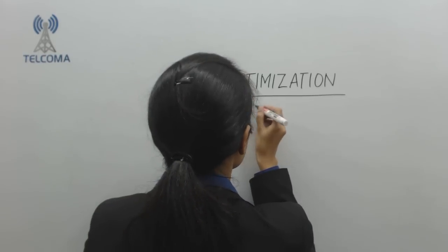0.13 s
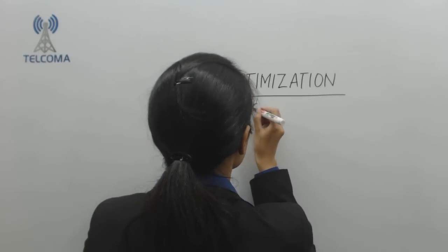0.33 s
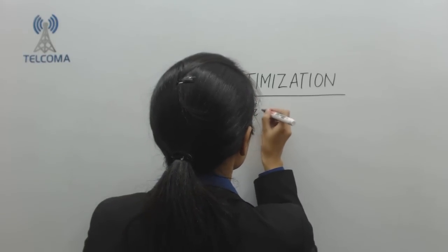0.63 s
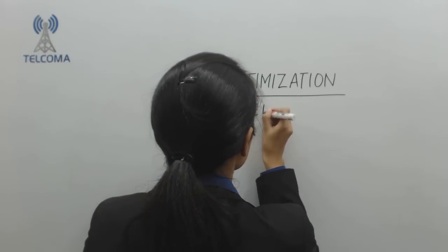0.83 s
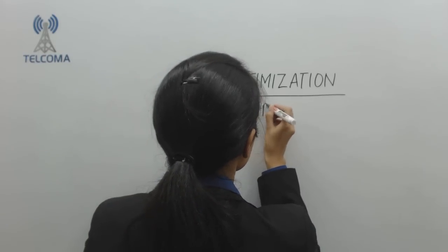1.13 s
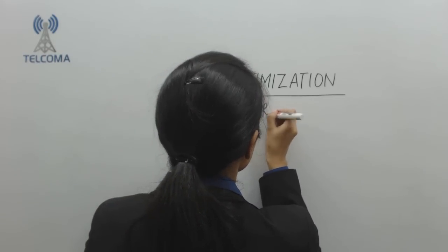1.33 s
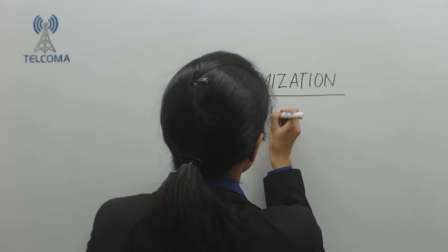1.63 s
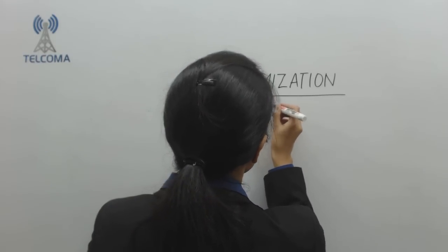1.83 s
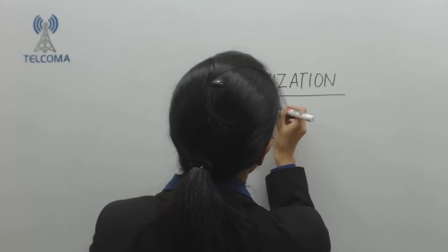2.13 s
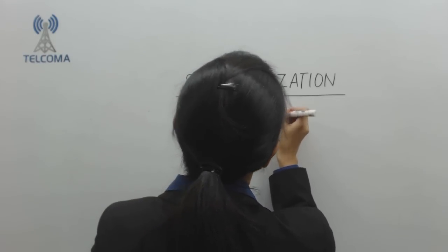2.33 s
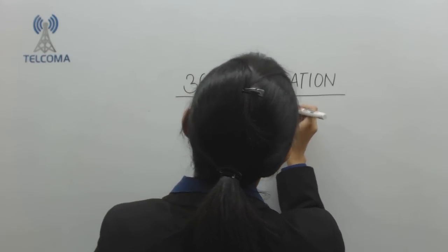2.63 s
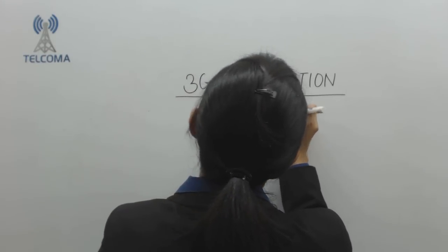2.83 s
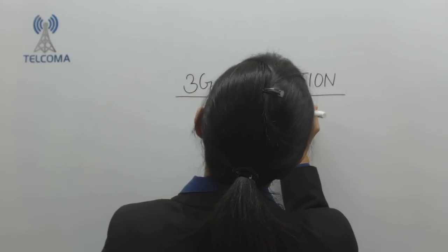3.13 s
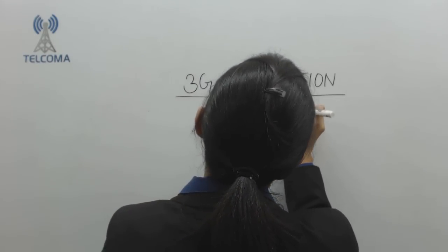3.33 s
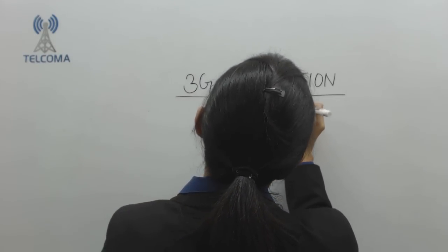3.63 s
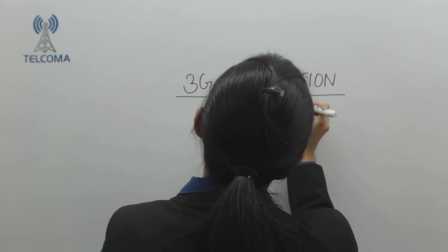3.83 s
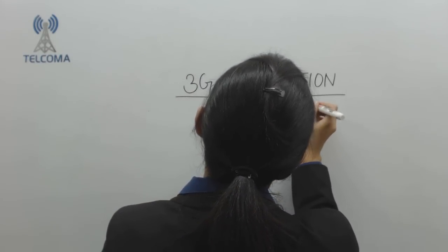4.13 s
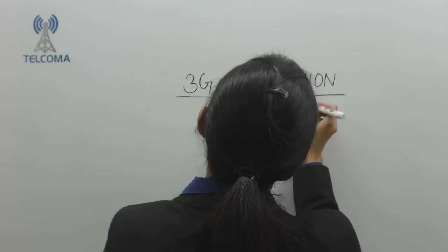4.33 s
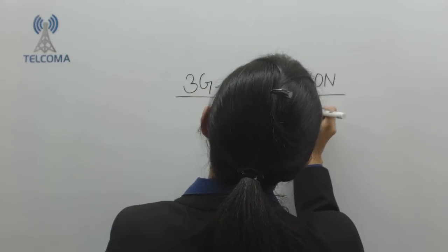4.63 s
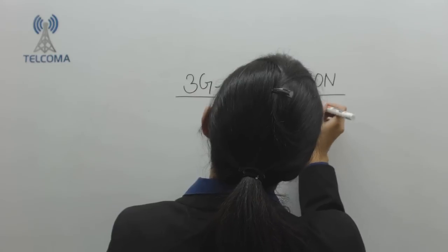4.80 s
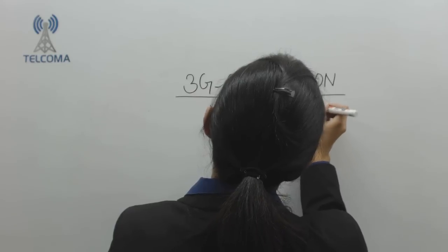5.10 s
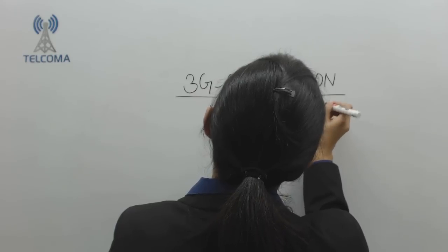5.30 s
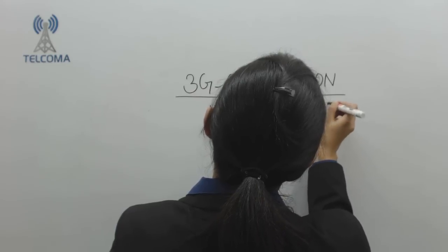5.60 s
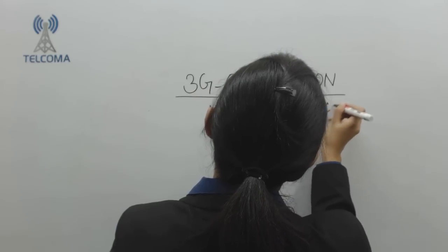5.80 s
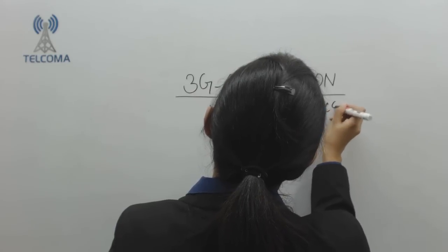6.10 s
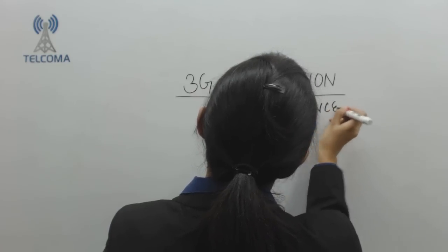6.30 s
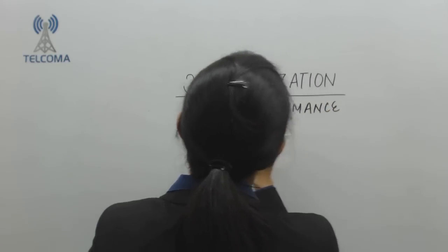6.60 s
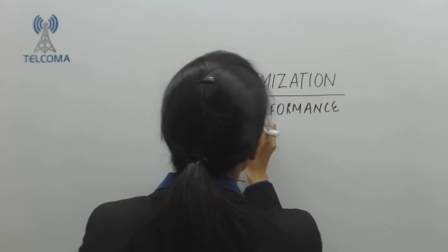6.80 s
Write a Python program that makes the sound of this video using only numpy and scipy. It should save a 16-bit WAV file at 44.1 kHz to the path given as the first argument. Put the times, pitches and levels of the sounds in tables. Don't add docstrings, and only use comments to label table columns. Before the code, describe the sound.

A low, slightly wavering fan hum with dull room noise runs throughout, briefly surging now and then. A faint felt hiss comes at 0.1 s, then the marker's first soft hollow thump on the whiteboard at 0.35 s. Similar thumps follow near 0.9, 1.15, 1.7 and 1.95 s, the loudest at about 2.2 s, then 2.35 and 2.9 s. Each is low, rounded and damped, with quick classroom echoes. Short airy strokes hiss quietly between them, and the dragging tip leaves a faint low panel ring. Weaker thumps come at 3.1 and 3.55 s, with a tiny scuff near 3.4 s. After a quieter stretch with light strokes, a firmer, knockier landing comes at 4.8 s, followed by smaller taps until 5.45 s. Faint strokes continue to about 6.4 s, then mostly hum, with slight panel ringing near the end. Thin recorder hiss and a barely audible high ticking whine remain.

```python
import sys
import numpy as np
from scipy import signal
from scipy.io import wavfile

SR = 44100
rng = np.random.default_rng(int(sys.argv[2]) if len(sys.argv) > 2 else 0)


def transcribe(u):
    v = np.clip(np.atleast_2d(u).T, -1, 1)
    q = np.round(v * 32767).astype(np.int16)
    wavfile.write(sys.argv[1], SR, q)


def ratio(d):
    e = np.asarray(d, float) / 20
    return 10 ** e


N = 306495


def rms_one(x):
    return x / np.sqrt(np.mean(x ** 2) + 1e-20)


def at_hz(points, hz):
    table_hz, value = np.transpose(points)
    return np.interp(np.log(hz), np.log(table_hz), value)


def drift(rate_hz):
    r = np.exp(-80 * np.pi * rate_hz / SR)
    noise = rng.standard_normal(N // 40 + 2002)
    slow = signal.lfilter([1], [1, -2 * r, r * r], noise)[2000:]
    return np.interp(np.arange(N) / 40, np.arange(len(slow)), rms_one(slow))


def resonate(x, hz, width_hz, count=1):
    r = np.exp(-np.pi * width_hz / SR)
    feed = np.array([1, 0, -1]) * (1 - r * r) / 2
    ring = [1, -2 * r * np.cos(2 * np.pi * hz / SR), r * r]
    for _ in range(count):
        x = signal.lfilter(feed, ring, x)
    return x


def pan(x, left_over_right_db):
    return x * ratio(np.array([[.5], [-.5]]) * left_over_right_db)


# start_s [s], peak_db [dB], hard_knock_db [dB re panel thump],
# near_wall_echo_db [dB], tail_db [dB]
LANDINGS = [(0.345, -21.5, -37, -13.5, -23.5), (0.616, -48, -30, -15, -29),
            (0.888, -21, -34.5, -13.5, -25.5), (0.991, -42.5, -29, -7, -26),
            (1.158, -23.5, -29.5, -18.5, -26), (1.67, -22, -41, -13.5, -23),
            (1.945, -17.5, -33.5, -10.5, -20.5), (2.179, -11.5, -22, -12, -19),
            (2.345, -17.5, -38, -9, -22.5), (2.458, -44.5, -17, -2.5, -28), (2.875, -16, -26, -12, -19),
            (3.119, -25.5, -36, -7, -24), (3.549, -21.5, -27, -14, -21.5), (4.27, -39.5, -14, -14, -25),
            (4.789, -14, -11, -11, -21), (4.963, -21, -18.5, -11.5, -27), (5.108, -45, -33, -18, -24),
            (5.199, -28.5, -19.5, -11, -27), (5.441, -38.5, -23, -24, -26), (6.017, -48.5, -21, -16, -13)]
# pitch_hz [Hz], width_hz [Hz], level_db [dB]
KNOCK_MODES = [
    (476, 182, 8.5),
    (666, 170, -4.5),
    (1110, 440, -22.5),
]
# delay_s [s], level_db [dB re tail]
FAR_WALLS = [
    (.041, -1),
    (.051, 3),
    (.063, -2.5),
    (.086, -8),
    (.114, -17.5),
]
# pitch_hz [Hz], width_hz [Hz], level_db [dB]
TAIL_MODES = [
    (177, 37, -6.5),
    (281, 140, -1),
    (446.3, 100, -6.5),
    (530, 200, -14),
]


def taps():
    panel_hz, panel_width_hz = 269.1, 143
    stiffening_per_db = .0035
    near_wall_s, knock_lag_s, swell_lead_s = .0258, 0.00591, 0.00603
    tail_t60_s, tail_cut_s = 0.25, 0.098

    out, length = np.zeros((2, N + SR)), SR // 4
    t = np.arange(length) / SR
    push = -np.sin(np.pi * np.clip(t / .0012, 0, 1)) ** 2

    knock = sum(ratio(db) * rms_one(resonate(push, hz, width, count=3)) for hz, width, db in KNOCK_MODES)
    knock = np.roll(knock, round(knock_lag_s * SR)) / abs(knock).max()

    modes = [ratio(db) * rms_one(resonate(push, hz, width, count=3)) for hz, width, db in TAIL_MODES]
    dull, bright = np.array([modes[0] + modes[1], modes[2] + modes[3]]) / abs(sum(modes)).max()

    build_up = np.clip((t - .010) / 0.0061, 0, 1)
    swell = build_up * ratio(-60 * t / tail_t60_s) / (1 + (t / tail_cut_s) ** 12)

    for start_s, peak_db, knock_db, echo_db, tail_db in LANDINGS:
        hz = panel_hz * (1 + stiffening_per_db * (peak_db + 20))
        body = resonate(push, hz * 0.99, panel_width_hz, count=5)
        body = body / abs(body).max()
        hard = ratio(knock_db) * knock

        paths = np.zeros(length)
        for delay_s, db in FAR_WALLS:
            arrival = round((delay_s + rng.normal(0, .001)) * SR)
            paths[arrival] = ratio(tail_db + db + rng.normal(0, 3.4))
        paths[0], paths[round(near_wall_s * SR)] = 1, ratio(echo_db)
        direct = signal.fftconvolve(paths, body + 0.26 * hard)
        direct[:length] += 0.53 * hard

        common, own = rng.standard_normal(length), rng.standard_normal((2, length))
        diffuse = ratio(tail_db - 20) * swell
        tail = signal.fftconvolve(diffuse * (common + 0.38 * own), dull[None], axes=1)
        wider = diffuse * (common + 1.0 * own) * ratio(0.28 * (knock_db + 28.5))
        tail += signal.fftconvolve(wider, bright[None], axes=1)

        at = round(start_s * SR) - round(swell_lead_s * SR)
        out[:, at:at + length] += pan(ratio(peak_db) * (direct + tail)[:, :length], 3.0)
    return out[:, :N]


# fastest_moment_s [s], length_s [s], hiss_db [dB],
# lower_resonance_db [dB re hiss], upper_pitch_hz [Hz]
FIRM_STROKES = [(0.097, 0.098, -74.5, -7, 6400), (0.471, 0.14, -82, -0.5, 6510),
                (0.64, 0.13, -78, -1, 6630), (0.975, .1, -67, -8, 6500), (1.318, 0.1, -80.5, -1, 6800),
                (1.456, 0.093, -81, -1, 6560), (1.755, .09, -70.5, -11, 6600),
                (1.989, 0.11, -79.5, 1.5, 6780), (2.439, .1, -74.5, -3, 7040), (2.545, .1, -72, -18, 6940),
                (2.625, .08, -81.5, 5, 6960), (2.953, 0.087, -72.5, -3, 7040),
                (4.088, 0.073, -70.5, -15, 7100), (4.358, 0.092, -68.5, -15, 7280),
                (4.604, .14, -83, -1, 6850), (5.049, .075, -67, -14, 7260), (5.269, 0.089, -85, 1, 6750),
                (5.521, .08, -72.5, -9, 7200), (5.815, 0.13, -75, -8, 7140), (6.281, 0.071, -78, -13, 7200),
                (6.34, .11, -83, -4, 7000)]
# fastest_moment_s [s], length_s [s], hiss_db [dB]
LIGHT_TOUCHES = [(2.225, .05, -86.5), (2.412, 0.062, -83), (3.25, .16, -87), (3.35, .12, -87),
                 (3.634, .1, -87), (3.86, .08, -86), (3.948, .09, -87), (4.475, .16, -87),
                 (4.831, .09, -88), (5.87, .14, -88), (6.11, .15, -87), (6.185, .12, -85.5)]


def strokes():
    light_low_db, light_hz = -1.5, 6850
    upper_width_hz, lower_width_hz = 1000, 1250
    lower_hz, sink_hz_per_s = 5220, 39
    lower_lag, lower_fade = 0.11, 1.1
    fade_db, rounding = 20.5, 1.4

    out = np.zeros((2, N))
    light = [(*row, light_low_db, light_hz) for row in LIGHT_TOUCHES]
    for s, length_s, hiss_db, low_db, upper_hz in [*FIRM_STROKES, *light]:
        a, b = round((s - .7 * length_s) * SR), round((s + .8 * length_s) * SR)
        t = np.arange(a, b) / SR
        place = 2 * (t - s) / length_s
        edge = np.clip(np.minimum(t - t[0], t[-1] - t) / 0.0075, 0, 1)

        slips = rng.standard_normal((3, SR // 4)) * ratio(2.0 * rng.exponential(1, SR // 4))
        slips = (slips[0] + 0.13 * slips[1:])[:, :b - a]
        upper = rms_one(resonate(slips, upper_hz, upper_width_hz, count=2))
        lower = rms_one(resonate(slips, lower_hz - sink_hz_per_s * s, lower_width_hz, count=2))

        upper_loss_db = fade_db * abs(place) ** rounding
        lower_loss_db = lower_fade * fade_db * abs(place - 2 * lower_lag) ** rounding
        upper *= ratio(2.0 * drift(60)[:b - a] - upper_loss_db)
        lower *= ratio(3.0 * drift(50)[:b - a] + low_db - lower_loss_db)
        out[:, a:b] += edge * ratio(hiss_db) * (upper - lower)
    return pan(out, -1.4)


# time_s [s], level_db [dB]
TIP_PRESSURE = [(0.0, -71.5), (0.71, -75.5), (0.85, -61.5), (1.24, -75.5), (2.15, -61), (2.32, -49.5),
                (2.52, -67.5), (2.61, -51.5), (2.74, -73.5), (3.04, -59.5), (3.17, -67), (3.31, -58),
                (3.89, -70.5), (4.68, -74.5), (4.82, -55.5), (5.48, -76), (6.75, -74), (6.95, -56.5)]
# pitch_hz [Hz], width_hz [Hz], level_db [dB]
LOW_PANEL_MODES = [
    (234, 16, 0.1),
    (290, 60, -13),
]


def rub():
    level_db = np.interp(np.arange(N) / SR, *np.transpose(TIP_PRESSURE))
    noise, ringing = rng.standard_normal(N), 0
    for k, (hz, width_hz, db) in enumerate(LOW_PANEL_MODES):
        sign = (-1) ** k
        ringing = ringing + sign * ratio(db) * rms_one(resonate(noise, hz, width_hz, count=2))
    return pan(ratio(level_db + 1.5) * rms_one(ringing), 2.9)


# time_s [s], length_s [s], level_db [dB]
BARREL_SCUFFS = [
    (3.43, .025, -80.5),
    (4.095, .04, -88),
]


def scuffs():
    t = np.arange(N) / SR
    touch = sum(ratio(db) * np.exp(-(2 * (t - s) / length_s) ** 2) for s, length_s, db in BARREL_SCUFFS)
    return touch * rms_one(resonate(rng.standard_normal(N), 2600, 1800, count=2))


# time_s [s], level_db [dB], length_s [s]
HUM_SURGES = [(0.182, -55, .08), (0.464, -51, .15), (0.91, -51, 0.095), (1.064, -43.5, 0.038),
              (1.159, -48.5, 0.11), (1.40, -54, 0.14), (1.53, -43.5, 0.023), (1.755, -52, 0.075),
              (1.881, -52, 0.088), (1.957, -50, 0.098), (2.26, -50.5, 0.13), (2.94, -43.5, 0.13),
              (3.06, -48.5, .07), (3.162, -48.5, 0.071), (3.541, -51.5, 0.11), (4.037, -54, 0.086),
              (4.16, -44, 0.036), (4.285, -52.5, .08), (4.403, -50, 0.063), (4.477, -47, 0.049),
              (4.518, -45, 0.088), (4.81, -44, 0.12), (4.979, -44.5, 0.063), (5.107, -51, .1),
              (5.212, -47.5, 0.063), (5.455, -54, .09), (5.813, -48.5, 0.069), (6.385, -51.5, 0.098),
              (6.625, -47, 0.045)]


def hum():
    fan_hz, usual_db, waver_db = 155.2, -61.5, 3.5
    t = np.arange(N) / SR
    level = ratio(usual_db + waver_db * drift(18))
    for s, db, length_s in HUM_SURGES:
        level = np.maximum(level, ratio(db - 17.0 * abs(2 * (t - s) / length_s)))
    phase = 2 * np.pi * np.cumsum(fan_hz + 2.0 * drift(5)) / SR
    tone = np.sqrt(2) * np.sin(phase)
    rumble = rms_one(resonate(rng.standard_normal(N), 165, 110, count=2))
    return pan(level * (tone + ratio(-12) * rumble), 1.5)


# pitch_hz [Hz], width_hz [Hz], level_db [dB]
DUCT_WHISTLES = [(400, 15, -84), (460, 15, -85), (565, 12, -84), (705, 25, -86), (900, 30, -91),
                 (1082, 20, -93), (2560, 90, -98), (3390, 90, -99.5)]


def duct():
    noise = rng.standard_normal(N)
    whistles = sum(ratio(db) * rms_one(resonate(noise, hz, width, count=2)) for hz, width, db in DUCT_WHISTLES)
    return pan(whistles, 1.5)


# pitch_hz [Hz], level_db [dB per Hz]
ROOM_NOISE = [(25, -31.5), (60, -29), (95, -16.5), (150, -7), (250, -11.5), (350, -22.5), (600, -28.5),
              (1150, -31.5), (1550, -42), (2600, -41), (3000, -49.5), (4200, -47.5), (7500, -53.5)]
# pitch_hz [Hz], likeness [1 = the same]
LEFT_RIGHT_LIKENESS = [(60, 0.85), (200, 0.91), (660, 0.95), (2180, 1), (7230, 0.91)]
# pitch_hz [Hz], left_over_right_db [dB]
LEFT_LEAN = [(60, 4.5), (130, 1.0), (300, 0), (660, 4.5), (1460, 3.0), (3250, -2), (7230, 1)]


def air():
    level_db, flicker_db = -59.5, 1.43
    out, edges = 0, 25 * 2 ** np.arange(0, 8.4, 1 / 3)
    white = rng.standard_normal((2, 2, N))
    flicker = [drift(7) for _ in range(5)]
    for k, (low, high) in enumerate(zip(edges, edges[1:])):
        band_filter = signal.butter(2, [low, high], "band", fs=SR, output="sos")
        mid, side = signal.sosfilt(band_filter, white[k % 2])
        hz = np.sqrt(low * high)
        alike = np.clip(at_hz(LEFT_RIGHT_LIKENESS, hz), -1, 1)
        band = np.sqrt(1 + alike) * mid + np.sqrt(1 - alike) * side * [[1], [-1]]
        wander_db = flicker_db * min(1 + 150 / hz, 2.2) * flicker[k % 5]
        out = out + ratio(at_hz(ROOM_NOISE, hz) + wander_db) * pan(band, at_hz(LEFT_LEAN, hz))
    return ratio(level_db) * rms_one(out)


# pitch_hz [Hz], width_hz [Hz], level_db [dB]
WHINE_BANDS = [
    (6750, 34, -93.5),
    (6880, 130, -96.5),
]


def whine():
    frames_per_s, first_s = 29.997, .0238
    turn = (np.arange(N) / SR - first_s) * frames_per_s
    gate = np.clip(0.22 + 2.5 * (np.cos(2 * np.pi * turn) - .3), .05, 1)
    tone = ratio(-97) * np.sin(2 * np.pi * np.cumsum(6750 + 12.0 * drift(20)) / SR)
    bands = sum(ratio(db) * rms_one(resonate(rng.standard_normal(N), hz, width)) for hz, width, db in WHINE_BANDS)
    return gate * (tone + bands)


def scene():
    pen = taps() + strokes() + rub() + scuffs()
    return pen + hum() + duct() + air() + whine()


def band_limit(x):
    return signal.sosfilt(signal.butter(12, 15800, fs=SR, output="sos"), x)


def record(dry):
    cutoff_hz, hiss_db, grit_db, smoothing_s = 7750, -97, -72, .006
    narrow = signal.sosfilt(signal.ellip(8, 1, 30, cutoff_hz, fs=SR, output="sos"), dry)
    share = 1 / (smoothing_s * SR)
    loudness = signal.lfilter([share], [1, share - 1], abs(dry).mean(axis=0))
    hiss_level = ratio(hiss_db + 1.5 * drift(5)) + ratio(grit_db) * loudness
    finished = narrow + hiss_level * rng.standard_normal(dry.shape)
    return band_limit(finished)


dry = scene()
out = record(dry)
transcribe(out)
```